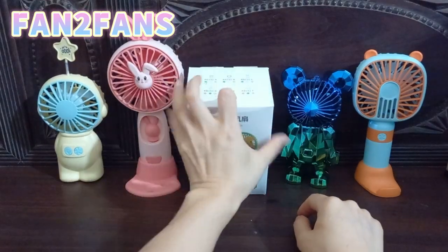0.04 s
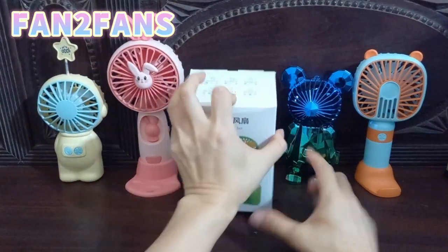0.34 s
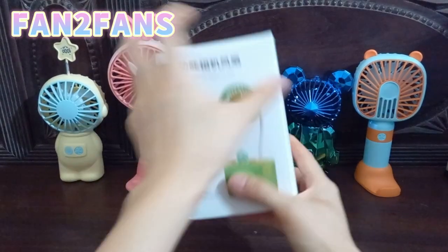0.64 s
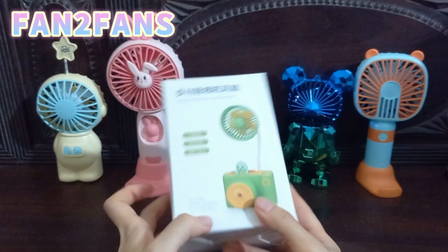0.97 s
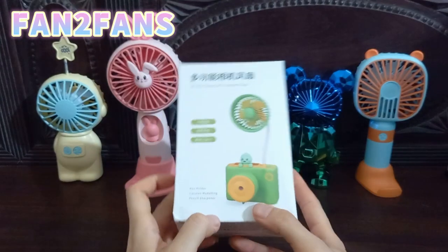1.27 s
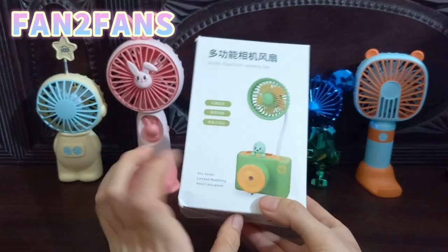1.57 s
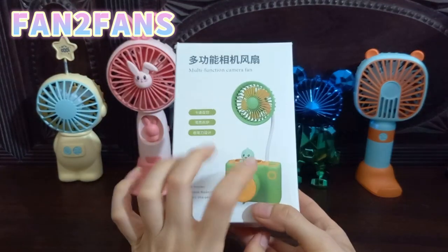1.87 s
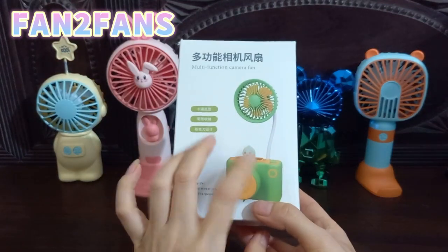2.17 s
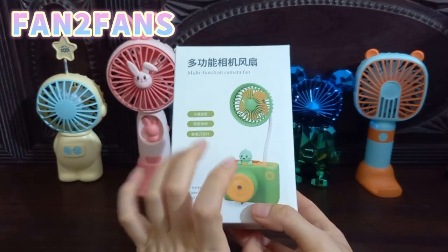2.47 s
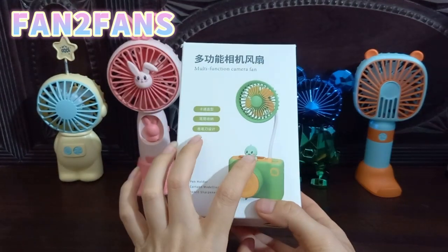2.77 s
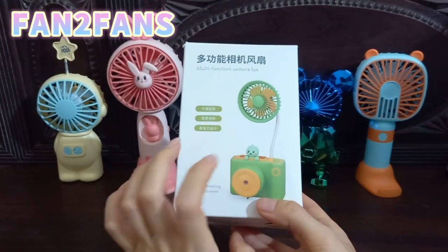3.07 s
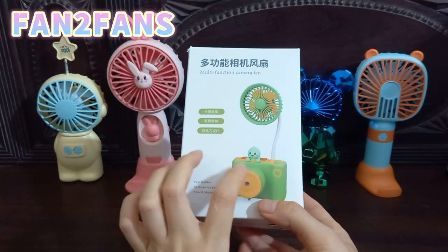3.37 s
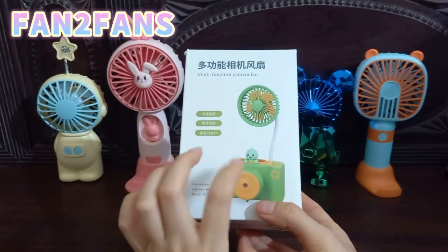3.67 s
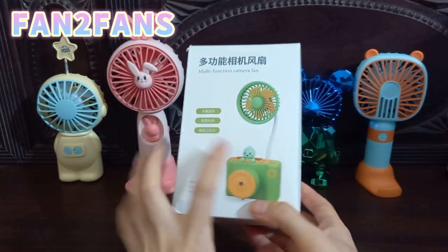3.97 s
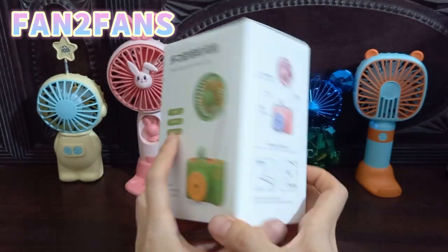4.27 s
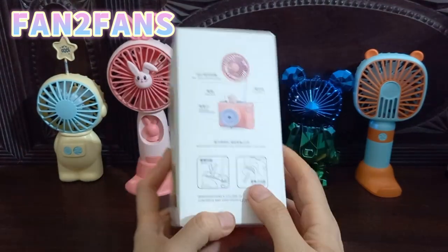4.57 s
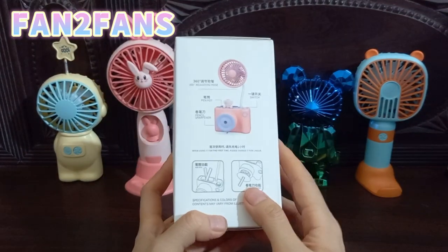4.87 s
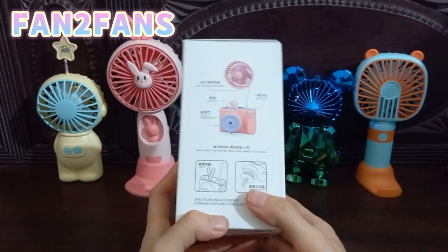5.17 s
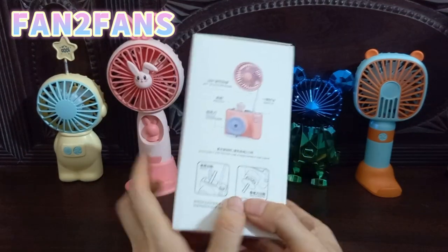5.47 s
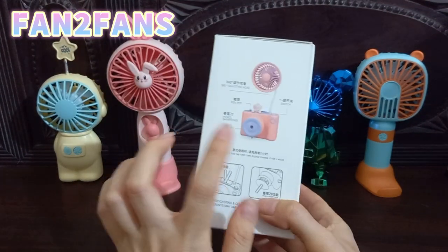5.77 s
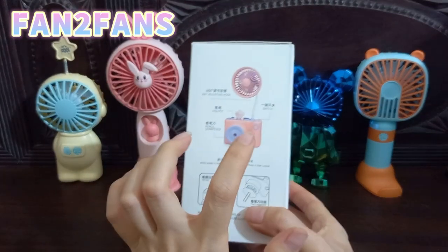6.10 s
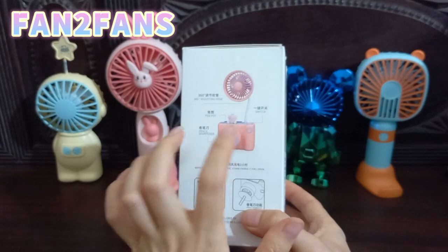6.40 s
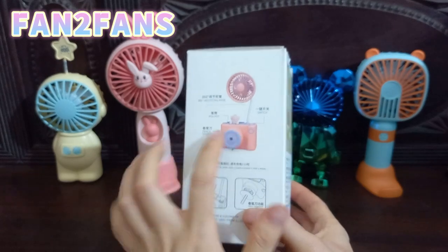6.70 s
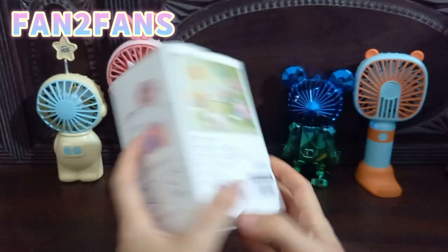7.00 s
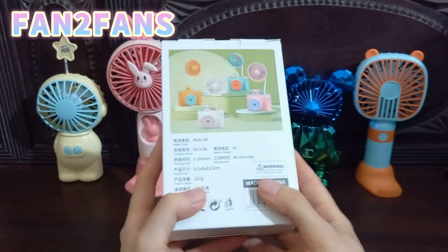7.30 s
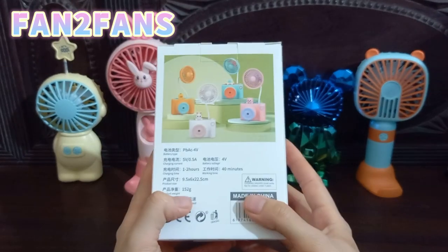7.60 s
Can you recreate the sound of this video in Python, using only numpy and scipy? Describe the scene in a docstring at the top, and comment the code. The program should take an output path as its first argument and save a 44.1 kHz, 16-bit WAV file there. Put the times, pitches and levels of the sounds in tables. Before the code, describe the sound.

A small cardboard box is picked up and turned, with skin sliding over it and fingertips tapping hollowly.

```python
"""Fingertips and nails drum on a small cardboard box: each tap dents the card, clicks and rings the panels.
Hands lift the box off a wooden table with dull bumps and turn it twice. Skin hisses, squeaks and
scrapes as it sticks and slips on the coated card, and now and then a fingertip snaps off a folded edge.
The box is close and a little to the left, in a room with a one-second tail and a low steady rush."""
import sys
import numpy as np
from scipy import signal
from scipy.fft import rfft, irfft, next_fast_len
from scipy.io import wavfile
from scipy.ndimage import uniform_filter1d

SR = 44100
rng = np.random.default_rng(int(sys.argv[2]) if len(sys.argv) > 2 else 0)


def inscribe(sig):
    """Save sig as 16-bit PCM at rate SR to the path in sys.argv[1].

    A 1-D sig is mono; a 2-D sig holds one channel per row.
    Samples are clipped to [-1, 1] before scaling.
    """
    pcm = np.round(np.clip(np.atleast_2d(sig).T, -1, 1) * 32767)
    wavfile.write(sys.argv[1], SR, pcm.astype(np.int16))


N = 337365
TIME = np.arange(N) / SR
RING_TIME = np.arange(int(.15 * SR)) / SR  # time axis of one short hit


def undb(db):
    """Decibels to gain."""
    return 10 ** (np.asarray(db) / 20)


def unit(x):
    """Scale to rms 1."""
    return x / np.sqrt(np.mean(x ** 2))


def fade(t, t60):
    """Exponential decay, 60 dB down after t60 seconds."""
    return np.exp(-np.log(1000) * t / t60)


def pan(db):
    """Stereo gains that put the left side db above the right."""
    return undb(np.array([[db], [-db]]) / 2)


def add(out, start, x):
    """Mix a sound into out at a start in seconds."""
    i = max(int(round(start * SR)), 0)
    out[..., i:i + x.shape[-1]] += x[..., :out.shape[-1] - i]


def colour(x, points):
    """EQ along a curve of (Hz, dB) points."""
    n = next_fast_len(x.shape[-1])
    hz, db = np.transpose(points)
    bin_hz = np.arange(n // 2 + 1) * SR / n
    gain = undb(np.interp(np.log(bin_hz + 1), np.log(hz), db))
    return irfft(rfft(x, n) * gain, n)[..., :x.shape[-1]]


def highpass(x, hz):
    """Second-order bass roll-off."""
    return signal.sosfilt(signal.butter(2, hz, "high", fs=SR, output="sos"), x)


def diffuse(n):
    """Noise with the room's stereo width: narrow in the bass, wide in the treble."""
    width = [(hz, side_db) for hz, _, _, side_db in ROOM_BANDS]
    mid, side = rng.standard_normal((2, n))
    pair = mid + colour(side, width) * np.array([[1], [-1]])
    flatten = [(hz, -10 * np.log10(1 + undb(db) ** 2)) for hz, db in width]
    return colour(pair, flatten)


def wander(rate):
    """Random drift with a spread near 1, through rate new values a second."""
    return np.interp(TIME * rate, np.arange(1024), rng.standard_normal(1024))


def ring(hz, t60, gain, t=RING_TIME):
    """Sum of decaying modes."""
    return gain @ (np.sin(2 * np.pi * hz[:, None] * t) * fade(t, t60[:, None]))


def burst(t60):
    """Many overlapping modes: a decaying puff with a smooth, even spectrum."""
    n = len(RING_TIME)
    envelope = fade(RING_TIME, t60)
    spectrum = rfft(diffuse(n) * envelope)
    puff = irfft(spectrum / (abs(spectrum) + 1e-18), n) * np.linspace(1, 0, n) ** 2
    return puff * np.linalg.norm(envelope)


# Tone of the background bed. Each row: frequency in Hz, relative level in dB.
RUSH_EQ = [(25, -14.5), (50, -17.5), (90, -12.5), (140, -5.5), (220, -4.5), (330, 0.5), (480, -3.5),
           (680, -12.5), (950, -24.5), (2000, -31.5), (5500, -43.5), (9000, -36.5), (16000, -43)]


def rush(level_db=-61, wander_db=1):
    """The room's low steady rush, wavering slightly."""
    return unit(colour(diffuse(N), RUSH_EQ)) * undb(level_db + wander_db * wander(3.3)) * pan(2)


# The reverb tail. Each row: frequency in Hz, level against the send in dB, t60 in seconds,
# width as side minus mid in dB.
ROOM_BANDS = [(61.3, -0.5, 0.6, -11), (162, -0.5, 0.9, -13), (310, -2.5, 1.05, -13), (650, -4, 0.97, -3),
              (1180, -1.5, 0.86, -0.5), (2440, -3.5, 0.75, -3.5), (5230, -4.5, 0.81, -2),
              (9380, -9, 0.66, -0.5), (16000, -11, 1.9, -1)]
# Distinct reflections. Each row: delay in seconds, level against the send in dB.
ROOM_ECHOES = [(0.0195, -23.5), (0.1439, -24.5), (.2355, -35)]


def room(send, predelay_s=.017, early_db=-9):
    """A diffuse tail, held down until the pre-delay has passed, with a few distinct echoes."""
    t = TIME[:int(1.4 * SR)]
    hz, db, t60, _ = np.transpose(ROOM_BANDS)
    noise = rfft(diffuse(len(t)))
    log_hz = np.log(np.linspace(1, SR / 2, noise.shape[1]))
    tail = 0
    for band, band_db, decay in zip(np.eye(len(hz)), db, t60):
        band_noise = irfft(noise * np.interp(log_hz, np.log(hz), band), len(t))
        envelope = fade(t, decay) * np.where(t < predelay_s, undb(early_db), 1)
        tail = tail + band_noise * envelope * undb(band_db) / np.linalg.norm(envelope)
    wet = signal.fftconvolve(send, tail, axes=1)[:, :N]
    for delay, echo_db in ROOM_ECHOES:
        add(wet, delay, send * undb(echo_db))
    return wet


# Tone of skin on the coating. Each row: frequency in Hz, relative level in dB.
HISS_EQ = [(700, -14), (1500, 3.5), (3000, -0.5), (5500, 3.5), (8000, 2.5), (12000, 3.5), (16000, 3)]
# Sliding strokes. Each row: start in seconds, length in seconds, relative level in dB,
# tilt in dB per octave.
SLIDE_STROKES = [(.0, .09, -78, 1), (0.092, 0.15, -67, -8), (0.23, .15, -59, 1.5), (0.554, 0.093, -60, 1),
                 (0.663, .19, -59, -3.5), (0.831, .08, -50, -5), (0.862, 0.36, -56, -1.5),
                 (1.189, 0.034, -60, 1), (1.26, 0.17, -64, -1), (1.485, 0.16, -69.5, 4),
                 (1.68, 0.047, -67, -0.5), (4.121, .07, -61.5, -6), (4.198, 0.12, -61.5, -2.5),
                 (4.37, 0.09, -66.5, -2.5), (4.508, 0.047, -62, -2.5), (4.583, 0.14, -67, 0.5),
                 (5.051, 0.13, -70, -0.5), (5.372, .31, -65, 2.5), (6.896, 0.22, -69, 2),
                 (7.121, 0.071, -55, -5.5), (7.19, 0.085, -54, -2), (7.254, .12, -59.5, -0.5),
                 (7.433, .08, -69.5, -1)]


def slides(trim_db=1.5, flutter_db=1.7, flutter_rate=90, grit_db=4, pivot_hz=7000, rise_share=0.3):
    """Skin speeds up and slows to rest; its grainy hiss follows the speed and flutters with the grip."""
    out = np.zeros((2, N))
    grains = diffuse(N) * undb(grit_db * unit(uniform_filter1d(rng.standard_normal(N), size=9)))
    hiss = unit(colour(grains, HISS_EQ)) * undb(flutter_db * wander(flutter_rate))
    for start, length, db, tilt in SLIDE_STROKES:
        stroke = hiss[:, int(start * SR):int((start + length) * SR)]
        progress = np.linspace(0, 1, stroke.shape[1])
        speed = np.sin(np.pi / 2 * np.interp(progress, [0, rise_share, 1], [0, 1, 0]))
        slope = [(hz, tilt * np.log2(hz / pivot_hz)) for hz, _ in HISS_EQ]
        add(out, start, colour(stroke, slope) * speed * undb(db))
    return out * undb(trim_db) * pan(2.5)


# Finger-pad squeaks. Each row: start in seconds, length in seconds, opening pitch in Hz, level in dB.
SQUEAKS = [(0.09, 0.022, 765, -45.5), (0.125, .026, 804, -43), (0.257, .036, 328, -36.5),
           (0.42, 0.016, 773, -46), (0.856, .02, 319, -25.5)]


def squeaks(wobble_depth=0.082, wobble_rate=130, sag_share=0.15, db_per_harmonic=-9):
    """A pad judders in nearly regular stick and slip: a few harmonics that sag as the finger slows."""
    out = np.zeros(N)
    wobble = 1 + wobble_depth * wander(wobble_rate)
    for start, length, hz, db in SQUEAKS:
        i, n = int(start * SR), int(length * SR)
        pitch = hz * wobble[i:i + n] * (1 - sag_share * np.linspace(0, 1, n))
        phase = 2 * np.pi * np.cumsum(pitch) / SR
        tone = sum(undb(db_per_harmonic * k) * np.sin((k + 1) * phase) for k in range(4))
        add(out, start, tone * np.hanning(n) * undb(db))
    return out * pan(3.5)


# Resonances of a scraped panel. Each row: frequency in Hz, t60 in seconds, relative level in dB.
PANEL_MODES = [(342, 0.0091, 7.5), (597, 0.031, 3.5), (655, 0.037, -0.5), (828, 0.015, -13),
               (1520, 0.021, 1), (1860, .012, -33), (2870, 0.014, -40)]
# Fingers dragging over the card. Each row: start in seconds, length in seconds, level in dB,
# tilt in dB per octave.
SCRAPES = [(0.008, 0.11, -61, -6.5), (0.085, 0.068, -48, -2), (0.257, 0.059, -47, -9),
           (0.289, 0.13, -52.5, 1), (0.409, 0.027, -47.5, -7), (0.57, 0.078, -47, 2.5),
           (0.829, 0.05, -42, -1), (0.863, 0.24, -47.5, -20), (4.23, 0.056, -55.5, -3.5),
           (4.352, 0.11, -61.5, -7.5), (4.621, 0.048, -59, -0.5), (5.341, 0.044, -60.5, -20),
           (5.514, 0.1, -61.5, -17), (5.608, 0.032, -63, 1), (6.89, 0.052, -51, 0.5),
           (7.294, 0.19, -63, -22)]


def scrapes(slips_per_s=1500, grit_db=3, low_cut_hz=260):
    """Skin sticks and slips at uneven steps; every slip rings the panel."""
    out = np.zeros(N)
    hz, t60, mode_db = np.transpose(PANEL_MODES)
    slipping = rng.random(N) < slips_per_s / SR
    slips = slipping * undb(grit_db * rng.standard_normal(N)) * rng.choice([-1, 1], N)
    for start, length, db, tilt in SCRAPES:
        i, n = int(start * SR), int(length * SR)
        pressure = signal.windows.tukey(n, .5)
        panel = ring(hz, t60, undb(mode_db + tilt * np.log2(hz / hz[2])))
        scrape = signal.fftconvolve(slips[i:i + n] * pressure, panel)
        add(out, start, scrape * undb(db) * np.sqrt(n / (np.sum(scrape ** 2) + 1e-18)))
    return highpass(out, low_cut_hz) * pan(2)


# Low end of the table and the loaded box. Each row: frequency in Hz, t60 in seconds before the hands
# damp it, relative level in dB.
LOW_MODES = [(66.5, 0.11, -29), (89, 0.14, -4), (114, 0.057, 2.5), (150.7, 0.9, -4), (232, 0.22, -1),
             (276.6, 0.14, -5)]
# The box is tipped and lifted. Each row: start in seconds, level in dB, push length in seconds
# (longer is softer).
LIFT_BUMPS = [(0.715, -32.5, 0.0022), (0.735, -39, 0.0017), (0.763, -44, 0.009), (0.85, -40, 0.0026),
              (0.904, -40, .0013), (0.966, -34, 0.0069), (.992, -26.5, .003), (1.031, -36, 0.0044),
              (7.298, -50, 0.0065)]


def bumps(gripped_t60=.11, free_t60=0.76, lift_off_s=1, free_for_s=0.019, low_cut_hz=70):
    """Soft pushes wake the low modes; the hands damp them except as the box swings free of the table."""
    out = np.zeros(N)
    hz, t60, mode_db = np.transpose(LOW_MODES)
    for start, db, length in LIFT_BUMPS:
        push = np.hanning(int(length * SR))
        freedom = np.exp(-((start - lift_off_s) / free_for_s) ** 2)
        longest_t60 = gripped_t60 + freedom * (free_t60 - gripped_t60)
        modes = ring(hz, np.minimum(t60, longest_t60), undb(db + mode_db), TIME[:SR])
        add(out, start, signal.fftconvolve(modes, push / push.sum()))
    return highpass(highpass(out, low_cut_hz), low_cut_hz) * pan(1.5)


# Resonances of the stiff fold. Each row: frequency in Hz, t60 in seconds, relative level in dB.
FOLD_MODES = [(1203, 0.035, -6.5), (1470, 0.02, -2), (2053, 0.045, -1.5), (2344, 0.02, 0.5),
              (2535, 0.031, -3), (3470, 0.011, -5)]
# Tone of a snap's crackle. Each row: frequency in Hz, relative level in dB.
CRACKLE_EQ = [(1000, -16.5), (3000, -6), (6000, -0.5), (9000, 4.5), (12000, -3.5), (16000, 1)]
# Snaps off an edge. Each row: start in seconds, relative ring level in dB, crackle level in dB,
# crackle time constant in seconds, pan as left minus right in dB.
EDGE_SNAPS = [(0.158, -38, -64, .004, 1.5), (1.5035, -80, -59, .003, 6), (1.584, -76, -51, 0.0033, 3),
              (4.521, -65, -68, 0.012, -1), (5.1077, -60, -38.5, 0.0032, 2), (7.154, -40, -53, 0.0025, 1),
              (7.1575, -26.5, -45, 0.0023, 4)]


def snaps(grit_db=4):
    """A fingertip slides off a folded edge: a short burst of slips crackles and rings the fold."""
    out = np.zeros((2, N))
    hz, t60, db = np.transpose(FOLD_MODES)
    fold = ring(hz, t60, undb(db)) / 2
    for start, ring_db, crackle_db, decay_s, pan_db in EDGE_SNAPS:
        slips = diffuse(len(RING_TIME)) * undb(grit_db * rng.standard_normal(len(RING_TIME)))
        crackle = unit(colour(slips, CRACKLE_EQ)) * np.exp(-RING_TIME / decay_s)
        add(out, start, (fold * undb(ring_db) + crackle * undb(crackle_db)) * pan(pan_db))
    return out


# Tone of a nail on card. Each row: frequency in Hz, relative level in dB.
NAIL_EQ = [(300, -23), (900, -1.5), (2000, -2), (2900, -2.5), (3900, 2), (5500, -2), (8000, -7.5),
           (12000, -11), (16000, -21.5)]


def nail_click(db, tick_db=8, tick_t60=0.005, tail_t60=0.044):
    """A nail hits the card: a sharp tick with a softer tail."""
    puff = burst(tick_t60) * undb(tick_db) + burst(tail_t60)
    return colour(puff, NAIL_EQ) * undb(db) * pan(2)


# What the walls send to the room. Each row: frequency in Hz, level relative to the struck modes in dB.
WALL_EQ = [(100, -17), (155, -8.5), (235, 6), (420, 5.5), (650, 6), (830, -3.5), (1350, -5.5), (2100, 1.5),
           (2900, -4), (4200, -8), (8000, -12.5), (16000, -17)]


def box_walls(hz, gain, trim_db=12.5, t60=0.046):
    """All six walls radiate into the room; their many modes fill the gaps between the struck ones."""
    peaks = list(zip(hz, 20 * np.log10(gain)))
    return colour(colour(burst(t60), peaks), WALL_EQ) * undb(trim_db)


# The voice of the box. Each row: frequency in Hz, t60 in seconds, then relative level in dB when struck
# mid-front, near the front's edge and on the side wall.
BOX_MODES = [(139, 0.081, -20, -23, -26.5), (230, 0.11, -7, -0.5, -26.5), (308.8, 0.06, -4, -1, 4.5),
             (385.2, 0.027, -6.5, 3.5, 11), (450, 0.05, -15, -2.5, -1.5), (567.4, 0.036, 5, 3.5, -1.5),
             (638, 0.059, -35.5, -12.5, -3.5), (860, 0.014, -3.5, 2.5, -7.5),
             (1228, 0.044, -21, -11, -33.5), (1323, 0.025, -10, -4, -16), (1490, 0.033, -21, -11, -13),
             (1720, 0.0077, -20, -37.5, -16.5), (1939, 0.04, -20.5, -12.5, -25.5),
             (2323, 0.028, -29.5, -20.5, -25.5), (3340, 0.019, -27, -19, -34)]
# Pitch ratio at those three places; the card is stiffer near its edge.
PLACE_TUNING = [1.028, 1.1, 1.025]
# The drumming. Each row: start in seconds, level in dB, place (0 mid-front, 1 edge, 2 side wall,
# fractions blend), hardness in dB per octave, nail accent in dB.
FINGER_TAPS = [(0.1586, -35.5, 2, 5, 0), (0.268, -44.5, 1.7, -6, -18), (0.5662, -50, 2, -9, -12),
               (0.5923, -37, 1.3, -4.5, -11), (0.5996, -34.5, 2, 9, -10), (.679, -53, 2, -3, -8),
               (0.844, -43, 1.8, 9, 3.5), (0.8574, -47, 1.8, 2, -7), (1.1284, -23.5, 1.5, 2, -0.5),
               (1.2025, -40.5, 2, 9.5, -1), (1.221, -44, 2, -6, -14), (1.8172, -28, 0.1, 3.5, -2),
               (1.834, -26, 1.2, 1.5, -1.5), (1.8416, -34, 1.2, 5, 6.5), (2.0118, -17.5, 0.3, 3.5, -2),
               (2.071, -28.5, 2, 9, 7), (2.0766, -17.5, 0, 3.5, -6), (2.2004, -32, 1.2, 3.5, 0),
               (2.275, -24, 0.75, 1.5, 0), (2.47, -25, 1.5, 4.5, 0), (2.4927, -31.5, 1, -1.5, 4),
               (2.6477, -19.5, 1, 1.5, 0), (2.7917, -47.5, 1.4, -8.5, 8), (3.3499, -16, 0.2, 3, -6),
               (3.6483, -18, 0.05, 3, -7), (3.9102, -17.5, 0.7, 2.5, -2.5), (5.575, -62, 2, -12, -27),
               (6.3235, -23, 1.8, 7, -2), (6.359, -40, 1.8, -5, -11), (6.5882, -15.5, 2, 6.5, -3),
               (6.8224, -37, 1.1, -0.5, -6), (6.9, -37.5, 0.75, 2, -1.5), (7.132, -45, 1.2, 1, -10),
               (7.159, -35, 2, 10.5, 11)]


def taps(click_db=-9, dent_s=0.00064, rise_s=.00005, beam_db=1.5, scatter_db=1.36, detune=0.023,
         low_cut_hz=135, side_extra_hz=60, send_low_cut_hz=85, send_db=-9):
    """A finger dents the card with a click and the panels ring. Returns close sound and reverb send."""
    close, send = np.zeros((2, 2, N))
    hz, t60, *place_db = np.transpose(BOX_MODES)
    octaves = np.log2(hz / 600)
    treble = np.minimum(hz / 1000, 1) ** 2
    fade_out = np.minimum(np.linspace(2, 0, len(RING_TIME)), 1)
    for start, db, place, hardness, nail_db in FINGER_TAPS:
        blend = np.maximum(1 - abs(place - np.arange(3)), 0)
        level_luck, beam_luck, grip_luck = rng.standard_normal((3, len(hz)))
        gain = (blend @ undb(place_db)) * undb(hardness * octaves + scatter_db * level_luck)
        # higher modes shift with the grip and beam to one side
        tuned_hz = hz * (blend @ PLACE_TUNING) * (1 + detune * treble * grip_luck)
        beam = undb(beam_db * beam_luck * treble * np.array([[1], [-1]]))
        body = ring(tuned_hz, t60, gain * beam)
        # the first inward dent cancels the air that the ringing panels push out; a nail makes it steeper
        dent = np.exp(-RING_TIME / dent_s) * (1 - np.exp(-RING_TIME * undb(nail_db) / rise_s))
        body = body - body.sum(axis=1, keepdims=True) * dent / dent.sum()
        hit = body + nail_click(click_db + nail_db)
        radiated = hit * undb(send_db) + box_walls(hz, gain)
        strength = undb(db) * pan(3) * fade_out
        cut_hz = low_cut_hz + side_extra_hz * blend[2]  # hits on the side wall lose more of their bass
        add(close, start, highpass(hit * strength, cut_hz))
        add(send, start, highpass(radiated * strength, send_low_cut_hz))
    return close, send


def arrive_from_left(x, lag_s=0.00004):
    """Direct sound reaches the right channel a moment after the left."""
    n = next_fast_len(N)
    bin_hz = np.arange(n // 2 + 1) * SR / n
    delay = np.exp(-2j * np.pi * bin_hz * lag_s)
    return np.array([x[0], irfft(rfft(x[1], n) * delay, n)[:N]])


def scene():
    """Taps and handling up close, their reverb behind them, the rush underneath."""
    close, send = taps()
    handling = snaps() + bumps() + scrapes() + squeaks() + slides()
    return arrive_from_left(close + handling) + room(send + handling) + rush()


def record(dry, top_hz=15700):
    """A steep high cut on the whole mix."""
    return signal.sosfilt(signal.ellip(8, .2, 70, top_hz, fs=SR, output="sos"), dry)


dry = scene()
out = record(dry)
inscribe(out)
```